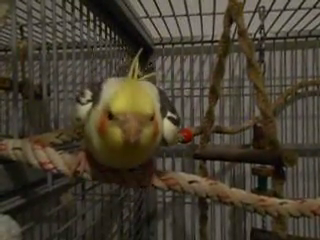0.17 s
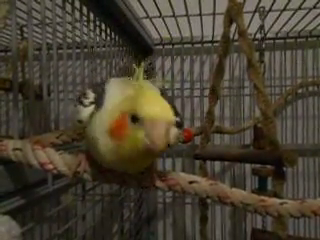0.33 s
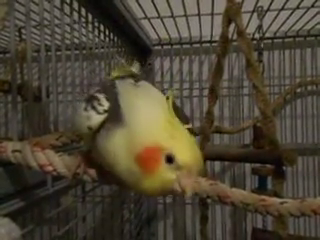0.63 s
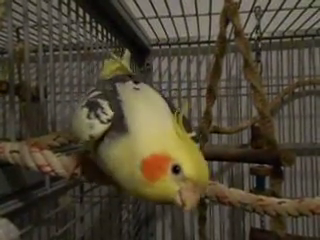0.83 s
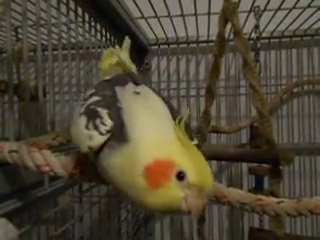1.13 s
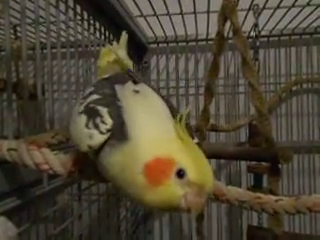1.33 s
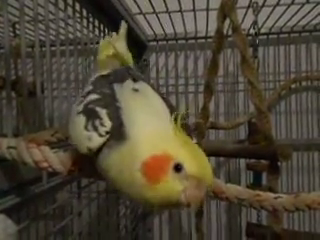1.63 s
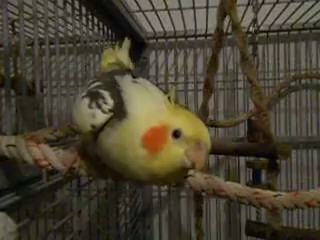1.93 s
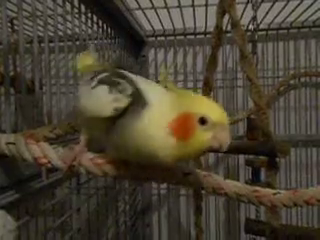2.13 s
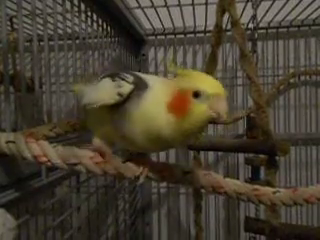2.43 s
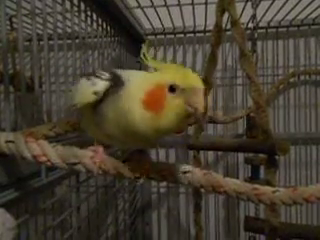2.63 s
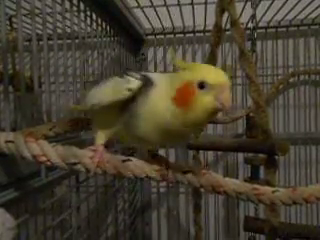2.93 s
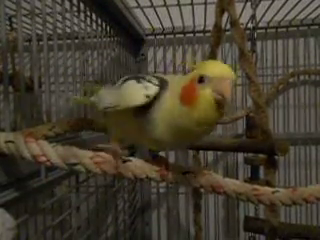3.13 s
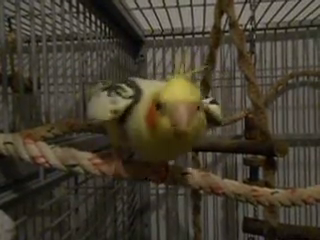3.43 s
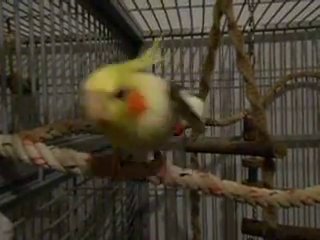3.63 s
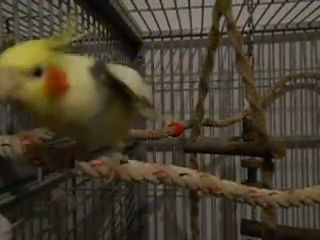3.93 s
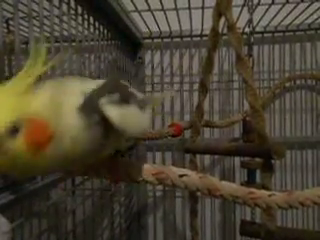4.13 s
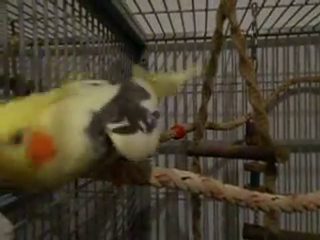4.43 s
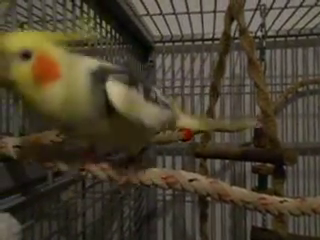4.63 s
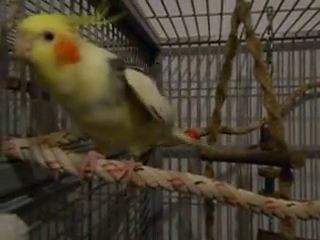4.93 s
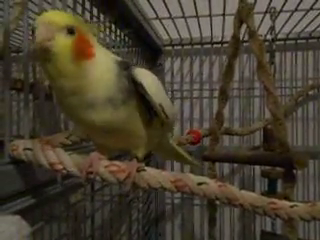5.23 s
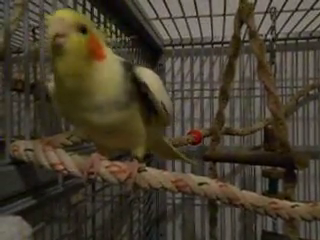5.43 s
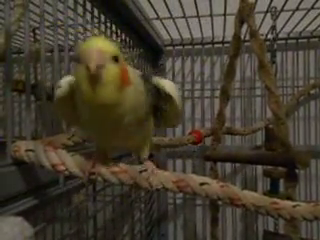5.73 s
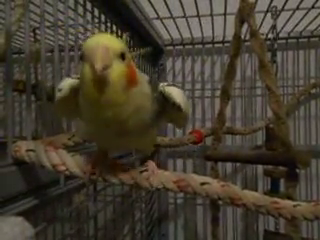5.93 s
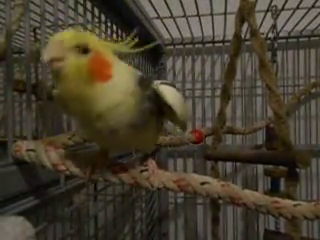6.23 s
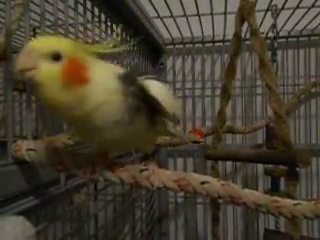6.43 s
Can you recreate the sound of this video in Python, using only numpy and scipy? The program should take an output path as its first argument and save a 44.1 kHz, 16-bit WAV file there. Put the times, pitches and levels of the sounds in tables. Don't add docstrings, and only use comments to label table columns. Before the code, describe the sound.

A cockatiel close by whistles rapid runs of short arched notes over perch ticks, while a small bell rings steadily and another bird shrieks far off.

```python
import sys
import numpy as np
from scipy import signal
from scipy.fft import next_fast_len
from scipy.io import wavfile
from scipy.ndimage import uniform_filter1d, minimum_filter1d

SR = 44100
rng = np.random.default_rng(int(sys.argv[2]) if len(sys.argv) > 2 else 0)


def digitize_waveform(pressure):
    field = np.atleast_2d(pressure).T
    bounded = np.clip(field, -1, 1)
    quanta = np.round(bounded * 32767).astype(np.int16)
    wavfile.write(sys.argv[1], SR, quanta)


def boost_factor(decibels):
    exponent = np.asarray(decibels, float) / 20
    return 10 ** exponent


N = 290619


def read(points, hz):
    f, value = np.transpose(points)
    return np.interp(np.log(hz + 1), np.log(f + 1), value)


def add(mix, s, sound):
    part = mix[round(s * SR):][:len(sound)]
    part += sound[:len(part)]


def smooth_noise(shape, size):
    return uniform_filter1d(rng.standard_normal(shape), size=size)


def bumps(t, rows):
    return sum(db * np.exp(-((t - s) / width) ** 2) for s, db, width in rows)


def hiss(spectrum, patchy_db, bands=()):
    frames, hz = N // 128 + 6, np.fft.rfftfreq(512, 1 / SR)
    a, b, patches = rng.standard_normal((frames, 257, 3)).T
    patches = uniform_filter1d(uniform_filter1d(patches, size=5, axis=0), size=20, axis=1)
    colour_db = read(spectrum, hz) + sum(db * np.exp(-((hz - f) / w) ** 2) for f, w, db in bands)
    z = (a + 1j * b) * boost_factor(colour_db[:, None] + patchy_db * patches / patches.std())
    x = signal.istft(z, nperseg=512, noverlap=384)[1][:N]
    return x / x.std()


# t/s, depth/dB, hold/s, recovery/s
DUCKS = [
    (0, -2, 0.046, 0.072),
    (1.128, -19, 0.081, 0.36),
    (1.845, -4, 0.41, 0.38),
    (3.88, -14, 0.072, 0.52),
    (4.534, -20.5, 0.13, 0.33),
    (5.465, -6, 1.24, .3),
]


def air_db():
    t, fall_s = np.arange(N) / SR, 0.058
    level_db = np.full(N, -59.5)
    for s, depth_db, hold, recovery in DUCKS:
        duck = np.minimum((t - s) / fall_s + 1, (s + hold - t) / recovery + 1)
        level_db += depth_db * np.clip(duck, 0, 1)
    return level_db


# f/Hz, level per Hz/dB
AIR_SPECTRUM = [(24, -48.5), (40, -29), (440, -8.5), (933, -9), (1020, -2.5), (1330, -9.5), (1640, -4.5),
                (1890, -5), (2880, -11), (3320, -15), (6720, -24.5), (11000, -36), (14300, -51.5),
                (22000, -120)]
# f/Hz, width/Hz, level/dB
DRONE_BANDS = [
    (610, 20, 1.5),
    (1580, 55, 6.5),
    (2080, 130, 5),
    (2800, 52, 4),
]
# f/Hz, level per Hz/dB
RUMBLE_SPECTRUM = [(20, -2), (60, -2.5), (200, 0.5), (600, -4), (1500, -18.5), (22000, -97.5)]


def background():
    air = boost_factor(air_db() + 14.5) * hiss(AIR_SPECTRUM, patchy_db=3.0, bands=DRONE_BANDS)
    return air + boost_factor(-68.5) * hiss(RUMBLE_SPECTRUM, patchy_db=1.5)


# f/Hz, level per Hz/dB
RUSTLE_SPECTRUM = [(35, -34), (60, -24.5), (232, -18.5), (367, -10.5), (418, -11.5), (2010, -5.5),
                   (2290, -14.5), (6660, -18), (10100, -24), (11000, -27), (14300, -37.5), (22000, -120)]


def feather_rustle():
    t, end_s = np.arange(N) / SR, .2
    swell_db = 3 * np.minimum(t / end_s, 1) ** 4
    fade_db = 300 * np.maximum(t - end_s, 0)
    return boost_factor(np.maximum(-37.5 + swell_db - fade_db, -90)) * hiss(RUSTLE_SPECTRUM, patchy_db=1.5)


# f/Hz, t60/s
ROOM_DECAY = [(300, 0.71), (1500, 0.33), (3000, 0.31), (4500, 0.15), (10000, 0.21)]


def room(x, stretch):
    taps = np.zeros(SR)
    at = np.arange(120, SR - 20, 20)
    taps[at + rng.integers(0, 20, len(at))] = rng.choice([-1., 1.], len(at))
    hz, t, z = signal.stft(taps, SR, nperseg=256)
    t60 = stretch * read(ROOM_DECAY, hz)[:, None]
    tail = signal.istft(z * boost_factor(-60 * t / t60), SR, nperseg=256)[1]
    return signal.fftconvolve(x, tail / np.linalg.norm(tail))[:N]


def columns(rows, size):
    s, *values = np.transpose(rows)
    t = np.arange(s[0], s[-1], 1 / SR)
    return t - s[0], [uniform_filter1d(np.interp(t, s, v), size, mode="nearest") for v in values]


def far_call(rows):
    t, (level_db, hz, upper_db, upper_hz) = columns(rows, size=200)
    tremble = 1 + [[.025], [.33]] * smooth_noise((2, len(t)), 70)
    low, high = 2 * np.pi * np.cumsum([hz, upper_hz] * tremble, axis=1) / SR
    voice = np.cos(low) + boost_factor(-29.0) * np.cos(2 * low) + boost_factor(-49) * np.cos(3 * low)
    upper = np.cos(high) + boost_factor(-16.5) * np.cos(1.5 * high) + boost_factor(-25.0) * np.cos(1.75 * high)
    return boost_factor(level_db + 4.0) * (voice + boost_factor(upper_db) * upper) * signal.windows.tukey(len(t), .05)


FAR_CALL_STARTS = [
    0.98,
    4.372,
]
# t/s, level/dB, f/Hz, upper voice level/dB, upper voice f/Hz
FIRST_CALL = [
    (0, -36, 1586, -9.5, 3460),
    (0.017, -22.5, 1837, -3, 3775),
    (.04, -17.5, 2268, -15.5, 4390),
    (0.062, -18.5, 2284, -11.5, 4800),
    (0.071, -15.5, 2630, -13.5, 4840),
    (.105, -16.5, 2940, -21.5, 4900),
    (0.131, -13.5, 3103, -45, 4800),
    (0.156, -31.5, 2910, -33, 5050),
]
SECOND_CALL = [
    (0, -28.5, 1674, -12.5, 3395),
    (0.018, -22.5, 1916, -11.5, 3850),
    (0.047, -14.5, 2267, -19, 4402),
    (0.065, -20.5, 2370, -12.5, 4800),
    (.078, -13.5, 2798, -18, 4900),
    (0.111, -12.5, 2965, -27.5, 5190),
    (.14, -20.5, 3113, -44, 5000),
    (0.175, -25, 3106, -48, 5000),
    (.2, -19, 3025, -39, 5030),
]


def far_bird():
    out = np.zeros(N)
    for s, shape in zip(FAR_CALL_STARTS, (FIRST_CALL, SECOND_CALL)):
        add(out, s, far_call(shape))
    return out


# t/s, level/dB of each of the four modes
BELL_STRIKES = [(1.303, -43, -52.5, -53.5, -52.5), (1.564, -40.5, -52, -35.5, -45),
                (1.827, -57, -48.5, -41, -47.5), (2.063, -51, -45, -35.5, -45),
                (2.304, -44.5, -35, -49.5, -42.5), (2.552, -49.5, -43.5, -38.5, -43),
                (2.789, -48, -40.5, -44, -43), (2.987, -42.5, -48.5, -46.5, -47),
                (3.214, -69, -40.5, -50.5, -42.5), (3.406, -68, -48.5, -57, -55),
                (3.764, -63.5, -45, -49.5, -51), (3.993, -52, -65, -50, -58),
                (4.24, -70.5, -54.5, -81, -55.5), (4.449, -66, -57, -54.5, -56),
                (4.7, -70, -60.5, -67.5, -82.5)]
# f/Hz, t60/s
BELL_MODES = [
    (1668, 1.5),
    (5000, 1.8),
    (5022, 1.8),
    (9905, .55),
]


def bell():
    out = np.zeros(N)
    ends = [row[0] for row in BELL_STRIKES[1:]] + [N / SR]
    random_turns = rng.random((len(BELL_STRIKES), 3, len(BELL_MODES)))
    for (s, *mode_db), end, turns in zip(BELL_STRIKES, ends, random_turns):
        t = np.arange(0, end - s + 0.0023, 1 / SR)
        ring = np.zeros(len(t))
        for (hz, t60), db, p, quick, lean in zip(BELL_MODES, mode_db, *turns):
            sway_db = 3.5 * np.sin(2 * np.pi * ((3 + 4 * quick) * t + lean))
            ring += boost_factor(db + 1.5 - 60 * t / t60 + sway_db) * np.sin(2 * np.pi * (hz * t + p))
        hz, t60 = BELL_MODES[-1]
        twin = np.sin(2 * np.pi * ((hz + 11) * t + turns[1, 0]))
        ring += boost_factor(mode_db[-1] - 3.5 - 60 * t / t60) * twin
        clapper = np.diff(rng.standard_normal(len(t) + 2), 2) / 2
        clapper = boost_factor(mode_db[-1] - 8 - 60 * t / .16) * clapper
        add(out, s, (ring * np.clip(t / .018, 0, 1) + clapper) * np.clip((t[-1] - t) / .01, 0, 1))
    return out


# t/s, peak level/dB, f/Hz,
# t60/s
TICKS = [(.982, -14.5, 1020, 0.029), (1.484, -26, 1030, 0.028), (2.035, -36.5, 4300, .004),
         (3.745, -17, 950, 0.058), (3.748, -30, 4200, .14), (4.2, -35, 6700, .004),
         (4.274, -26, 600, 0.17), (4.275, -33, 220, .2), (4.287, -43.5, 6000, .006),
         (4.309, -50, 6000, 0.0065), (5.15, -52, 6600, .08), (4.944, -20, 2400, 0.01),
         (4.944, -27, 6000, .008), (4.945, -28, 1100, .02), (5.213, -29, 4500, .09),
         (5.466, -19, 1000, .03), (5.487, -19.5, 1050, .03), (5.83, -24, 1750, 0.7),
         (5.84, -42, 3300, .7), (5.845, -47, 5000, .7),
         (.82, -32, 800, 0.019), (0.981, -29, 2100, 0.02), (1.072, -36, 700, 0.017),
               (1.11, -34.5, 800, 0.012), (1.12, -45.5, 700, 0.016), (1.267, -33, 900, 0.024),
               (2.431, -48, 220, 0.27), (2.598, -20.5, 1000, 0.018), (3.469, -26.5, 2000, 0.013),
               (3.471, -25, 1600, 0.024), (3.478, -42.5, 3500, 0.043), (3.486, -27.5, 2200, 0.037),
               (4.533, -44.5, 900, 0.011), (4.642, -53.5, 400, .03), (5.655, -27, 900, 0.016),
               (5.821, -39, 1000, 0.015), (2.739, -51, 90, 0.15), (0.499, -28.5, 990, 0.03),
               (.618, -22.5, 900, 0.014), (.75, -24.5, 830, 0.016), (3.25, -34.5, 1200, 0.04),
               (3.318, -22.5, 1110, 0.061), (3.756, -21.5, 2600, 0.13), (4.35, -38.5, 457, 0.66),
               (4.462, -33, 900, 0.016), (2.1, -50, 252, 0.47)]


def ticks():
    t, out = np.arange(4000) / SR, np.zeros(N)
    for s, peak_db, hz, t60 in TICKS:
        ring = signal.iirpeak(hz, 1.1 + 5 * max(t60 - .2, 0), SR)
        burst = signal.lfilter(*ring, rng.standard_normal(len(t)))
        burst = signal.lfilter(*ring, burst) * boost_factor(-60 * t / t60)
        burst *= np.clip((t[-1] - t) / .02, 0, 1)
        add(out, s, boost_factor(peak_db) * burst / abs(burst).max())
    return out


def note_shape(length, peak_db, open_hz, crest_hz, swell_db, close_s,
               crest, bend, swell, fall, fall_power, close_db):
    t = np.arange(0, length, 1 / SR)
    open_s = length - close_s
    u = t / open_s
    crest = np.clip(crest, .2, 1)
    closing = np.clip((t - crest * open_s) / (length - crest * open_s), 0, 1)
    hz = crest_hz + (open_hz - crest_hz) * np.clip(1 - u / crest, 0, 1) ** bend
    hz = hz * (1 - fall * closing ** fall_power)
    level_db = peak_db - swell_db * np.clip(1 - u, 0, 1) ** swell
    return t, level_db + close_db * np.clip((t - length) / close_s + 1, 0, 1) ** 1.5, hz


# t/s, pitch shift/share, level shift/dB, width/s
VOICE_CATCHES = [(0.85, -0.017, 0, 0.0062), (0.86, 0.036, -1.5, 0.0058), (1.5173, -0.017, 4, 0.0036),
                 (1.745, 0.018, 3, 0.0079), (1.761, -0.041, 3, .007), (1.92, 0.059, -5.5, 0.0046),
                 (2.199, -0.059, -1, 0.0053), (1.791, 0.0095, 6.5, .012), (2.582, -0.018, -1, 0.005),
                 (3.368, -0.072, 1, 0.0074), (2.886, 0.05, -3, 0.0026), (3.538, -0.0099, -1.5, 0.012),
                 (5.801, -0.022, 2.5, .01), (5.598, -0.02, 0.5, .01), (5.26, -.02, 0, 0.005),
                 (3.2115, 0.077, -2, 0.004), (5.612, 0.056, -1.5, 0.0044), (.47, -0.019, 2, 0.0089),
                 (.605, 0.0083, 6.5, 0.0078), (.73, -0.015, 2.5, 0.0079), (3.085, -0.0074, 0, 0.0067),
                 (3.237, 0.02, 1, 0.0062), (5.509, 0, 4, .01), (1.129, -0.085, -8, 0.013),
                 (1.9, -0.11, 1, .012), (3.44, 0.049, 11, 0.0069), (3.754, -0.081, -2, 0.0024),
                 (3.769, 0.068, -0.5, 0.0071), (5.2154, 0.18, 6.5, 0.0016), (5.245, -0.058, -0.5, 0.0078),
                 (5.2705, 0.025, -0.5, 0.0069), (6.146, 0.21, -2.5, 0.0032), (6.563, 0.052, -2, 0.0064),
                 (0.239, -0.0063, 1.5, .008), (0.494, 0.044, 6, 0.0045), (0.608, 0.012, -0.5, 0.0045),
               (.736, .036, 2, 0.0044), (0.858, .03, -0.5, 0.013), (.85, 0, 0.5, .006),
               (1.215, .04, 2, .012), (1.421, .05, 0.5, 0.012), (1.548, 0, 0.5, 0.01),
               (1.759, -.026, 0.5, 0.014), (1.789, .02, 0, 0.0086), (1.813, 0.0027, 1, 0.012),
               (1.902, 0.048, 2, .012), (1.934, -.044, -1, 0.0079), (2.082, -.047, -0.5, .007),
               (2.44, 0.016, -3.5, 0.0085), (2.54, -.038, 0.5, .012), (2.599, .06, 3, 0.0058),
               (2.843, -0.028, 2.5, .012), (3.243, -.083, -1, 0.0062), (3.337, .025, 1.5, .01),
               (3.384, .066, 3, 0.0064), (3.885, -0.013, 1.5, .006), (3.915, 0.00098, 0, 0.0052),
               (3.925, .02, 5, 0.0069), (4.21, 0.0085, 1.5, 0.0088), (5.27, .05, 5, .005),
               (5.49, .015, 0, .015), (5.598, -.03, 0.5, .016), (5.74, 0, 0, .012),
               (5.822, -0.07, -2.5, .007), (5.94, 0, 1, 0.025), (5.986, 0.057, 1.5, 0.015),
               (6.219, -.03, -1, 0.0085), (6.295, -.048, -0.5, .016), (6.346, .08, 1, .008),
               (6.48, .08, 3, 0.0059), (3.091, -0.0077, -0.5, 0.015)]


def bend_voice(at, level_db, hz):
    for s, shift, shift_db, width in VOICE_CATCHES:
        bump = np.exp(-((at - s) / width) ** 2)
        hz, level_db = hz * (1 + shift * bump), level_db + shift_db * bump
    return level_db, hz * (1 + .07 * smooth_noise(len(at), 200))


BEAK_OPENINGS = [0.868, 1.525, 2.184, 2.867, 3.504, 3.77, 5.236, 6.179, 6.574]
# t/s, level/dB, width/s
OVERTONE_BREAKS = [(0.591, -2, 0.019), (.7, -0.5, 0.0089), (.84, -4.5, 0.03), (1.36, 9, .012),
                   (1.395, -2, 0.013), (5.251, -8, .008), (5.93, -2.5, 0.0056), (1.233, -2.5, .006),
                   (1.246, -5, 0.0087), (1.745, 12, 0.027), (1.781, -6, 0.0073), (1.892, -3, 0.015),
                   (1.928, -4.5, 0.013), (2.031, -6.5, 0.0088), (2.543, 7, 0.014), (2.68, -16.5, 0.013),
                   (2.855, 0.5, .01), (3.32, -13.5, 0.006), (3.374, 0.5, 0.0095), (3.792, -10, 0.013),
                   (4.17, 5.5, 0.0061), (5.6, 3.5, .008), (5.776, 3.5, 0.0022), (5.793, -1.5, 0.0054),
                   (6.42, 4, 0.0081)]


def harmonic_tone(t, note, level_db, hz, phase, second_db, third_db):
    start, length, _, _, crest_hz = note
    opens = max([s - start for s in BEAK_OPENINGS if s < start + length] + [-1])
    shut_db = -16.0 * np.clip((opens - t) / 0.0087 + .5, 0, 1) + 0.13 * (level_db - level_db.max())
    shut_db = shut_db + bumps(start + t, OVERTONE_BREAKS)
    flutter_db = 64.0 * smooth_noise((8, len(t) + 400), 400)[:, 200:-200]
    waver = sum(np.sin(2 * np.pi * (f * t + rng.random())) for f in (35, 60, 95))
    tone = np.cos(phase) * boost_factor(.4 * waver)
    slope_db = 4.45 + 1.4 * (crest_hz > 1600)
    overtones_db = [second_db, third_db] + [third_db - slope_db * n for n in range(1, 6)]
    for k, db in enumerate(overtones_db, 2):
        dull_db = -5.0 * np.maximum(k * hz / 1000 - 6.5, 0)
        level = boost_factor(db + shut_db + dull_db + flutter_db[k - 1])
        tone = tone + level * np.cos(k * phase) * (k * hz < 10600)
    return boost_factor(level_db) * tone


# f/Hz, level/dB
CROAK_SPECTRUM = [(300, -18.5), (650, 0), (1300, 11), (2600, 0), (4000, -10), (7000, -32), (10000, -38)]
# note start t/s, level/dB
CROAK_LEVELS = [(.437, -3.5), (.556, -4.5), (.673, -1), (.818, 2), (1.196, -8.5), (1.34, -8), (1.492, -8),
                (1.729, -6.5), (1.884, -12), (2.017, -2.5), (2.161, -9), (2.534, -12.5), (2.669, 0),
                (2.822, -4.5), (3.048, -4.5), (3.182, -5), (3.313, -2.5), (3.477, 0.5), (3.741, -2),
                (3.877, -4), (4.004, 0), (4.137, -4.5), (4.334, 0), (5.907, 2), (5.211, -2.5), (5.586, 9.5),
                (5.725, -2), (6.14, -3.5), (6.292, -5), (6.41, -2.5), (6.551, -7)]


def onset_croak(t, note, hz, phase, croak_db, croak_s):
    start, _, peak_db, *_ = note
    croak_db += sum(db for s, db in CROAK_LEVELS if abs(s - start) < .012)
    every = max(round(np.median(hz) / 680), 2)
    wobble = 2.6 * smooth_noise(len(t), 260)
    croak = np.zeros(len(t))
    for k in range(1, 15):
        if k % every:
            level = boost_factor(read(CROAK_SPECTRUM, k * hz / every))
            croak += level * np.cos(k * (phase / every + wobble))
    croak *= 1 + 1.3 * smooth_noise(len(t), 24)
    croak = signal.sosfilt(signal.butter(4, [480, 7500], "band", fs=SR, output="sos"), croak)
    fade = np.clip(t / .003, 0, 1) / (1 + (t / max(croak_s, .003)) ** 12)
    return croak * boost_factor(croak_db + peak_db + 3) * fade


def whistle(note, voice, kind):
    start, *shape = note
    swell_db, close_s, second_db, third_db, croak_s = voice
    *kind_shape, croak_db = kind
    t, level_db, hz = note_shape(*shape, swell_db, close_s, *kind_shape)
    level_db, hz = bend_voice(start + t, level_db, hz)
    phase = 2 * np.pi * (np.cumsum(hz) / SR + rng.random())
    tone = harmonic_tone(t, note, level_db, hz, phase, second_db, third_db)
    croak = onset_croak(t, note, hz, phase, croak_db, croak_s)
    edges = np.clip(np.minimum(t / .004, (t[-1] - t) / .003), 0, 1) ** 2
    return (tone + croak) * np.sqrt(2) * edges


# t/s, length/s, peak level/dB, opening f/Hz, crest f/Hz
LOW_NOTES = [(0.207, 0.045, -18, 1364, 1272), (0.817, 0.09, -14.5, 1602, 1450),
             (1.496, 0.09, -23, 1407, 1415), (2.161, 0.085, -14, 1389, 1566),
             (2.825, 0.086, -18, 1440, 1333), (3.476, 0.096, -20, 1563, 1362),
             (4.332, 0.088, -25.5, 1246, 1368), (5.211, 0.063, -17, 1185, 1255),
             (5.906, 0.086, -24, 1266, 1228), (6.551, 0.058, -18, 1515, 1282)]
LEAD_NOTES = [(.437, 0.059, -16, 2252, 1988), (1.055, 0.078, -15.5, 2200, 2033),
              (1.729, 0.097, -12.5, 1807, 2067), (2.411, 0.068, -14.5, 2334, 2145),
              (3.047, 0.078, -10.5, 2059, 2229), (3.741, 0.071, -11.5, 1865, 1932),
              (4.136, .088, -12.5, 1900, 1737), (5.461, 0.075, -12.5, 2176, 2124),
              (6.14, 0.096, -10.5, 1933, 1832), (1.814, 0.024, -20.5, 1890, 2144)]
ARCH_NOTES = [(1.197, 0.074, -20.5, 1708, 2011), (1.34, 0.087, -14.5, 1628, 2030),
              (1.881, 0.069, -12.5, 2090, 2352), (2.532, 0.07, -10, 2260, 2470),
              (3.18, 0.074, -8.5, 2108, 2308), (3.313, 0.083, -11, 1870, 2117),
              (3.874, 0.061, -8, 2211, 2513), (6.41, 0.078, -14, 1733, 1947)]
FLAT_NOTES = [(0.556, 0.065, -11, 2200, 2252), (0.672, 0.079, -10.5, 1890, 2038),
              (2.014, 0.08, -13, 1981, 2068), (2.669, 0.079, -14, 2094, 2036),
              (4.003, 0.067, -12, 2015, 2332), (5.586, .077, -8.5, 2089, 2268),
              (5.725, 0.11, -11.5, 1933, 1995), (6.288, 0.063, -7, 1831, 2195)]
# swell/dB, closing/s, 2nd harmonic level/dB, 3rd harmonic level/dB, croak length/s
LOW_VOICES = [(-5.5, 0.015, -16, -9.5, 0.0044), (8, 0.018, -1, -15.5, 0.0038),
              (14, 0.029, -5, -13.5, 0.012), (15, 0.018, -8, -24.5, 0.01), (12, 0.022, -11.5, -16.5, 0.014),
              (10, 0.028, -15.5, -16.5, 0.015), (4, .014, -23, -56.5, 0.17),
              (3.5, 0.0092, -10, -7.5, 0.021), (2.5, 0.013, -8, -17, 0.0025),
              (8.5, 0.012, -20.5, -28.5, 0.024)]
LEAD_VOICES = [(2.5, 0.014, -22.5, -22.5, 0.012), (2.2, 0.017, -41.5, -32, 0.0052),
               (17.5, 0.0218, -30.5, -36.5, 0.013), (10, 0.027, -24, -30, 0.0024),
               (13.3, 0.016, -34.5, -37.5, 0.035), (14, 0.011, -15.5, -27.5, 0.046),
               (16.7, .02, -27, -29.5, 0.019), (5.5, 0.027, -33, -34.5, 0.0048),
               (12, 0.013, -30.5, -33, 0.043), (5, 0.0089, -30, -34, 0.001)]
ARCH_VOICES = [(14, 0.019, -23, -27, 0.0093), (18.5, .024, -26.5, -33.5, 0.0078),
               (14.7, 0.016, -30.5, -22.5, 0.012), (17, 0.017, -32, -28.5, 0.011),
               (9.3, 0.022, -28, -34.5, 0.017), (16, .028, -25.5, -31.5, 0.011),
               (9.2, 0.021, -23.5, -30, 0.013), (17, 0.036, -25.5, -35, 0.012)]
FLAT_VOICES = [(12, 0.033, -36.5, -27.5, 0.0081), (17, 0.023, -35.5, -32, 0.014),
               (18, 0.028, -25.5, -33.5, 0.0089), (12.5, 0.012, -37, -33.5, 0.012),
               (5.1, 0.0094, -26.5, -30, 0.0065), (7, .02, -36, -34.5, 0.0026),
               (14, 0.029, -36.5, -33.5, 0.013), (11, 0.02, -33.5, -33.5, 0.0096)]
# pitch crest/share of swell, bend power, swell power, pitch fall/share, fall power,
# closing level/dB, croak level re peak/dB
LOW_KIND = (0.76, 1.64, 1, .2, 3, -15, -19.5)
LEAD_KIND = (2.66, 0.89, 2.13, .25, 1.2, -16, -28)
ARCH_KIND = (0.92, 1.1, 1.47, .45, 2.4, -16.5, -29)
FLAT_KIND = (.5, 1.5, 3, .45, 4.5, -17.5, -31)


def near_bird():
    out = np.zeros(N)
    for kind, notes, voices in [(LOW_KIND, LOW_NOTES, LOW_VOICES), (LEAD_KIND, LEAD_NOTES, LEAD_VOICES),
                                (ARCH_KIND, ARCH_NOTES, ARCH_VOICES), (FLAT_KIND, FLAT_NOTES, FLAT_VOICES)]:
        for note, voice in zip(notes, voices):
            add(out, note[0] - .002, whistle(note, voice, kind))
    return out


def scene():
    near, far = near_bird() + ticks(), far_bird()
    near_sound = near + boost_factor(-13.5) * room(near, stretch=1.0)
    far_sound = boost_factor(-5) * far + boost_factor(2.0) * room(far, stretch=.95)
    next_rooms = boost_factor(-12.5) * room(far + boost_factor(-9) * near, stretch=2.5)
    return (near_sound + far_sound + next_rooms + bell() + background() + feather_rustle())[None]


# start t/s, end t/s, share of swing above which crests flip, same for troughs
OVERFLOWS = [
    (3.9146, 3.9167, .88, 1.5),
    (3.9250, 3.9254, 1.5, .8),
    (5.6165, 5.6350, .9, .9),
    (6.3110, 6.31235, .9, .9),
]


def overflow(x, swing, limit):
    t = np.arange(len(x)) * 2 / SR
    margin = swing * (1 + .06 * smooth_noise(len(x), 20))
    for start, end, crest, trough in OVERFLOWS:
        flips = (x > crest * margin) * 1. - (x < -trough * margin)
        full = limit * x / (swing + 1e-9)
        x = np.where((t > start) & (t < end), 1.1 * (full - 1.8 * limit * flips), x)
    return x


def low_pass(x):
    return signal.sosfilt(signal.butter(12, 12330, fs=SR, output="sos"), x)


def record(dry):
    x = signal.lfilter(*signal.butter(2, 70, "high", fs=SR), dry[0])
    x = signal.oaconvolve(x, signal.firwin(101, 10300, fs=SR), "same")[::2]
    swing = abs(signal.hilbert(x, next_fast_len(len(x))))[:len(x)]
    limit, top = .69, .92
    gain = np.minimum(1, limit / (uniform_filter1d(swing, size=8) + 1e-9))
    x = x * minimum_filter1d(gain, size=8)
    x = overflow(x, np.minimum(swing, limit), limit)
    stuffed = np.zeros(2 * len(x))
    stuffed[::2] = 2 * x
    loose = signal.firwin(41, 11000, window=("kaiser", 5), fs=SR)
    smooth = signal.oaconvolve(stuffed, loose, "same")
    return low_pass(np.clip(smooth, -top, top)[None, :N])


dry = scene()
out = record(dry)
digitize_waveform(out)
```